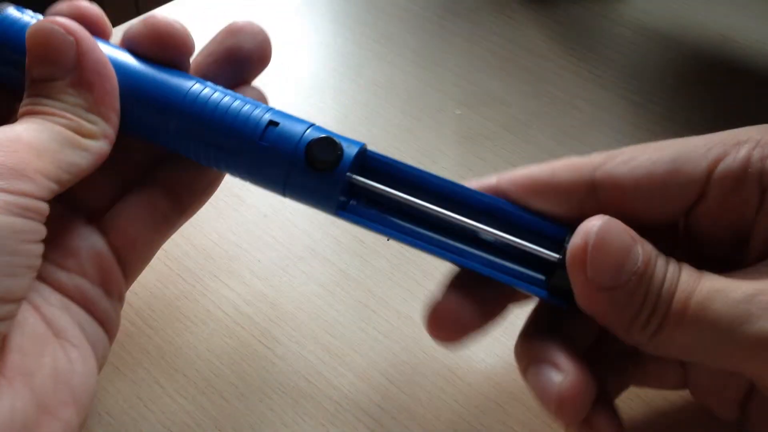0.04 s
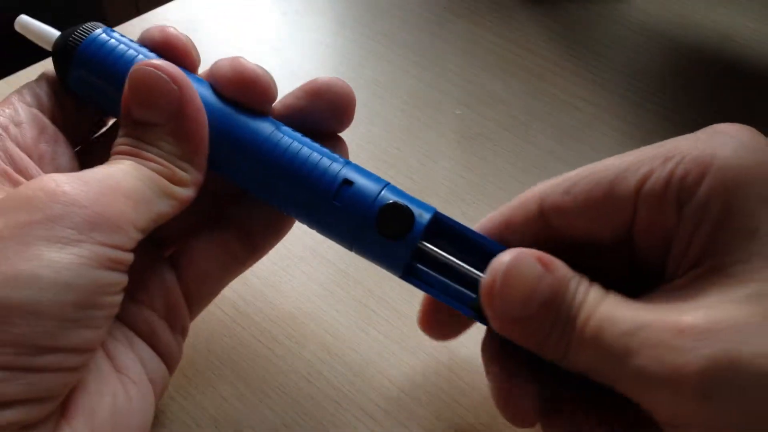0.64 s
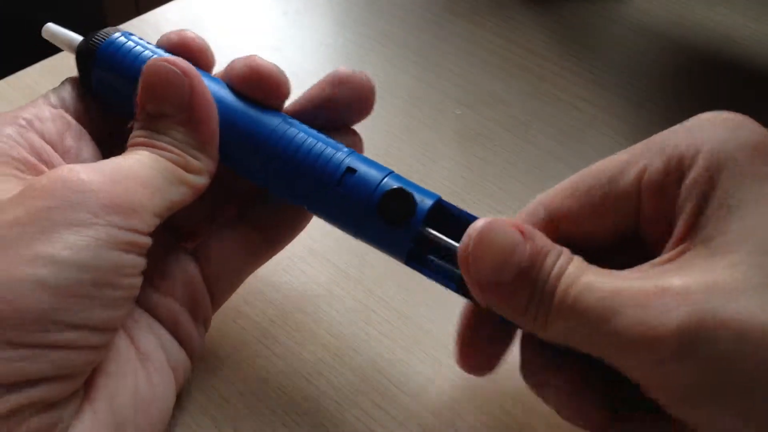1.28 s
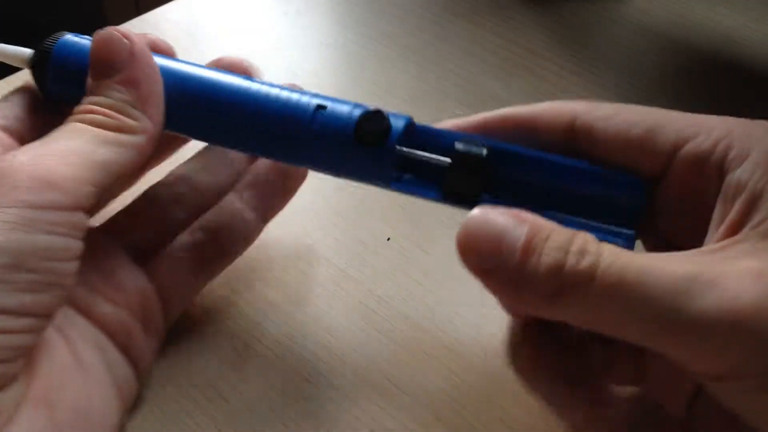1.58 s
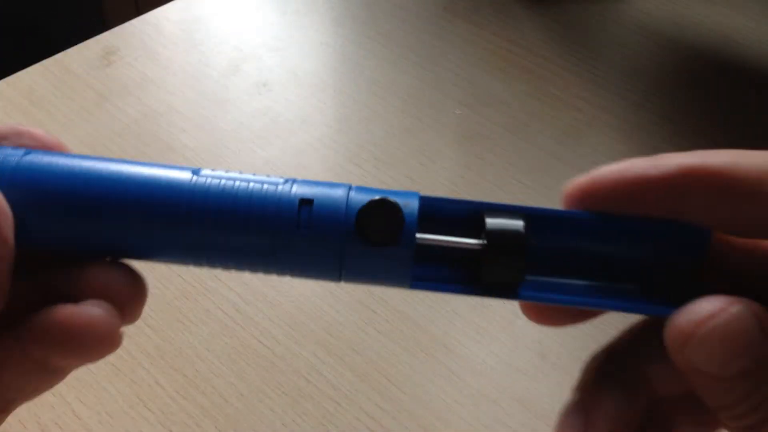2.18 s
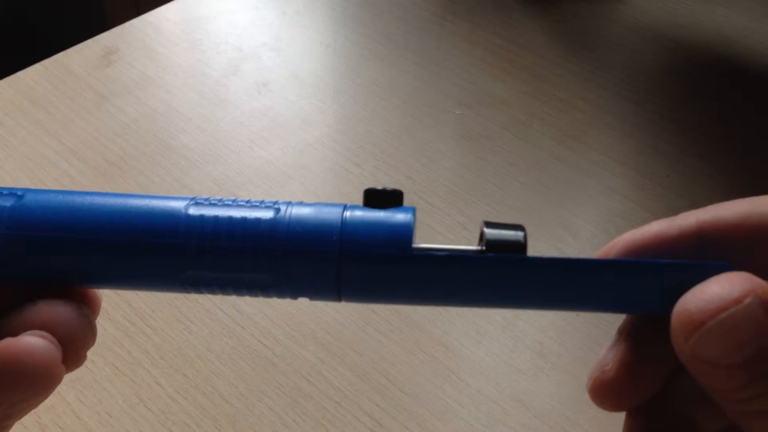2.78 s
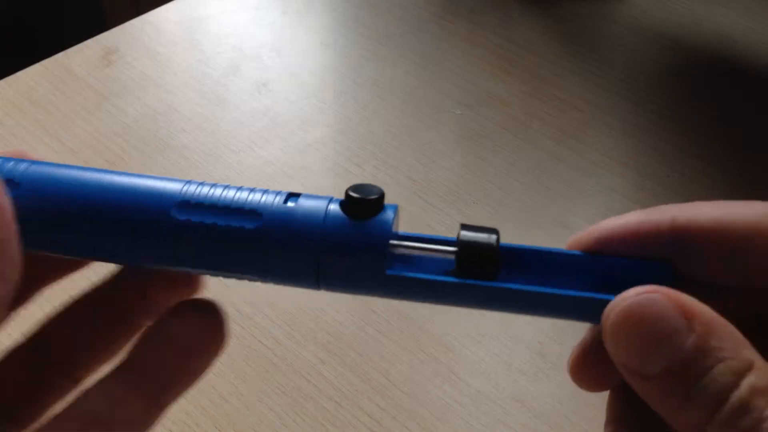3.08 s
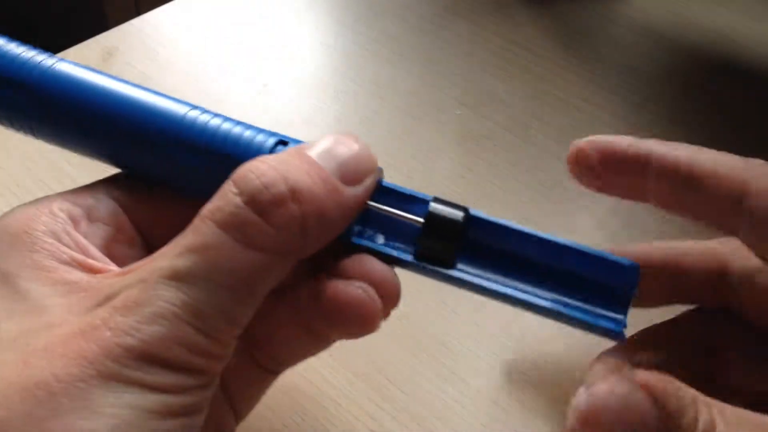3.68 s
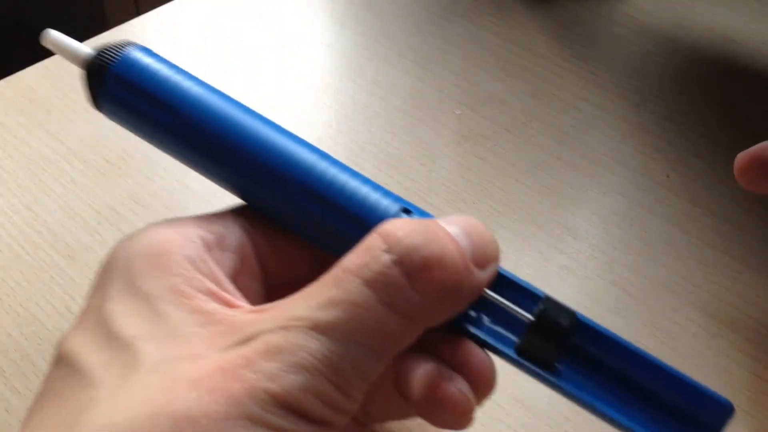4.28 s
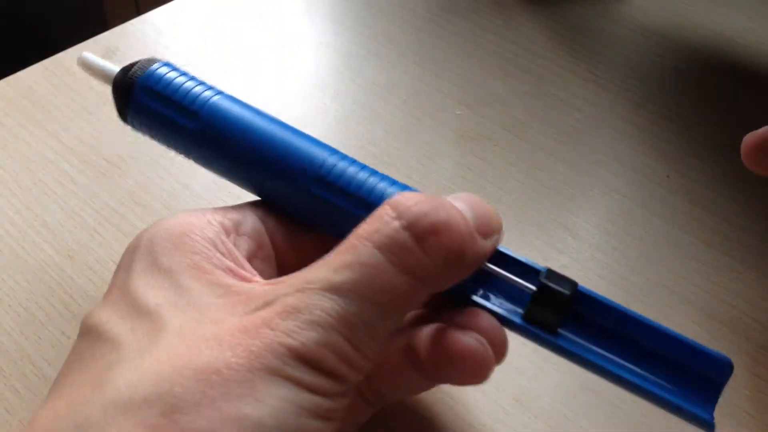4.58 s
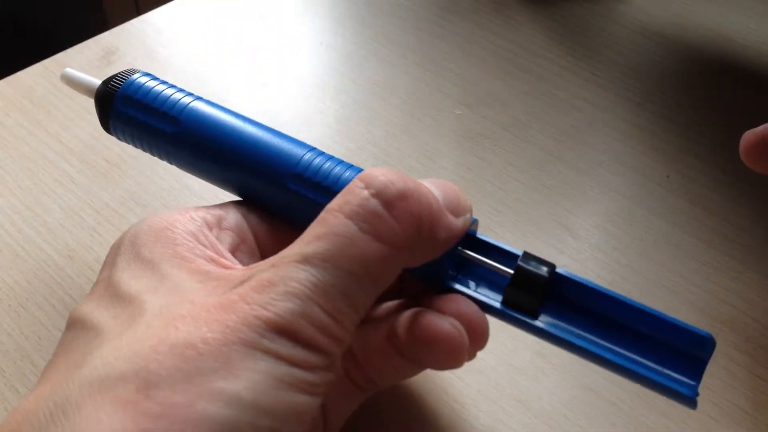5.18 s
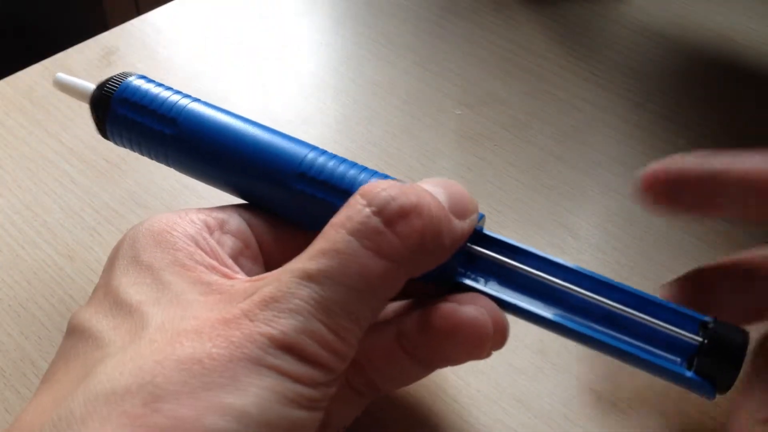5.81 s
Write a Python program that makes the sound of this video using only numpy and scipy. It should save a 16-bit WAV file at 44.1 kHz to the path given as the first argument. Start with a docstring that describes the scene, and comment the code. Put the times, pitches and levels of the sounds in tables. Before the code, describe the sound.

A plastic desoldering pump is cocked close to the microphone in a small, quiet room. The plunger goes in with short, slightly squeaky scrapes and ticks, then latches with a sharp crack. The shell creaks and the slider zips back with a click. Fingers rub faintly on the plastic for a few seconds. Then a soft button click is followed at once by a loud snap, with a low thud and a brief high ring from the steel spring.

```python
"""A plastic desoldering pump is cocked and fired close to the microphone in a small, quiet room.
The plunger scrapes in over a few stick-slip pushes and latches with a crack; the shell creaks and the
slider runs back. Fingers shift their grip, then the button clicks: the piston shoots up the barrel,
slams into its stop and sets the steel spring ringing. Gain control ducks the hiss after both cracks."""
import sys
import numpy as np
from scipy import signal
from scipy.fft import rfft, irfft
from scipy.io import wavfile

SR = 44100
rng = np.random.default_rng(int(sys.argv[2]) if len(sys.argv) > 2 else 0)


def store_pcm(level_fs):
    """Save levels as 16-bit WAV."""
    pcm = np.round(np.clip(level_fs, -1, 1) * 32767).astype(np.int16)
    wavfile.write(sys.argv[1], SR, np.atleast_2d(pcm).T)


N = 257984
TIME = np.arange(N) / SR

# room air and microphone hiss: (frequency [Hz], level [dB])
AIR_COLOUR = [(15, -51), (25, -29), (52, -6), (85, -8.5), (130, -9), (190, -7), (300, -4.5), (480, -9.5),
              (720, -10.5), (1000, -16), (2300, -18.5), (6000, -21), (15000, -22)]
# slow fader ride of the dull background: (time [s], gain [dB])
SWELL_RIDE = [(0, -67.5), (1.5, -73), (2.6, -78), (4.25, -68.5), (5.85, -68)]
# its tone: (frequency [Hz], level [dB])
SWELL_TONE = [(60, -13), (200, 0.5), (330, 0), (650, -6), (1100, -12), (2500, -19.5), (6000, -35)]
# low room modes: (frequency [Hz], width [Hz], level [dB])
LOW_MODES = [(194, 30, -3), (320, 43, 1), (356, 25, -2), (445, 43, -1), (474, 8.3, -6.5), (640, 35, -4.5),
             (690, 46, -4), (970, 30, -11)]
# skin on plastic: (frequency [Hz], level [dB])
SKIN_COLOUR = [(800, -13.5), (1800, -10), (3000, -0.5), (5500, 0), (8000, -3.5), (12000, -5.5),
               (15000, -6.5)]
# finger slides: (middle [s], length [s], level [dB])
FINGER_RUBS = [(.15, .6, -73), (1.64, .06, -68), (2.01, .1, -66), (2.13, .12, -65.5), (2.29, .1, -71),
               (3.27, .45, -70), (3.9, .25, -72.5), (4.4, .7, -77.5)]
# soft knocks through the hands: (time [s], level [dB], pitch [Hz], decay [s])
HAND_KNOCKS = [(.16, -56.5, 196, .025), (1.110, -37, 105, 0.0061), (1.3138, -34, 620, .0012),
               (1.313, -32.5, 243, 0.0035), (1.714, -53, 200, 0.011), (1.745, -57, 110, 0.011),
               (5.339, -42.5, 250, .0061)]
# short ticks, some just ahead of the loud cracks: (time [s], level [dB], bass [dB], treble [dB])
SHORT_TICKS = [(.3553, -36.5, -20, -1), (.3946, -48, -8, 0), (.5232, -51, -15, 10), (.53, -44, -8, -2),
               (.5912, -35, -17, -13), (.6250, -45.5, -5, -5), (.7002, -50, 8, 3), (.7912, -52, 3, 5),
               (.8189, -35.5, -5, 2), (.8227, -33, -10, 8), (.8252, -27, -12, 5), (.9216, -41, 1.5, 6.5),
               (.9654, -36.5, 0, 1.5), (1.0110, -37.5, 3.5, 2.5), (1.0240, -45, 6, -2),
               (1.0802, -35, 0.5, 1), (1.0849, -44.5, -5, -7), (1.1080, -49, -5, -1),
               (1.1900, -42.5, -5.5, -10), (1.2530, -43, -22.5, 4.5), (1.2728, -39, -5.5, -3),
               (1.2928, -35, -8, 2), (1.3137, -24.5, 9, 10), (1.4723, -51.5, -13, -4.5),
               (1.495, -58, -6.5, -2.5), (3.602, -58, 7, -10), (3.752, -58.5, 5.5, -8),
               (5.3348, -41, -3, 5.5), (5.7400, -56.5, 4, -12)]
# plastic shell: (frequency [Hz], width [Hz], level [dB])
SHELL_MODES = [(780, 240, -3), (1980, 180, -8.5), (2880, 300, -6), (3600, 280, -2), (4050, 220, 1),
               (4870, 630, -4.5), (5700, 500, -4), (7230, 800, -7.5), (9600, 1200, -14.5),
               (13000, 2300, -22.5)]
# pushes on the plunger: (start [s], length [s], level [dB], growth [dB], rod squeak in the mix [dB])
PLUNGER_PUSHES = [(.357, .11, -62, 2.5, 6.3), (.529, .04, -55.5, 1, 7), (.572, .023, -50, 5, 0),
                  (.608, .115, -56.5, 2, -7), (.738, .085, -61, 2, -15), (.965, .035, -58, 0, -12),
                  (1.06, .035, -60, 0, -12)]
# barrel under friction: (frequency [Hz], width [Hz], level [dB])
BARREL_MODES = [(1120, 280, -1), (2100, 840, -7), (3250, 340, -2), (3640, 200, -2), (4320, 260, -5),
                (4950, 520, -7), (6600, 1400, -15), (9000, 1100, -14), (12000, 2500, -26)]
# squeaking rod: (frequency [Hz], width [Hz], level [dB])
ROD_MODES = [(2710, 190, -1.5), (3060, 290, -4.5), (4750, 400, -9), (5200, 300, -12), (7900, 490, -22.5)]
# one resonance falls as the plunger goes in: (time [s], frequency [Hz])
PLUNGER_SWEEP = [(.45, 5100), (.59, 4450), (.67, 4050), (.73, 3550), (.8, 3200)]
# fine grit of the rubbing surfaces: (frequency [Hz], level [dB])
FIZZ_COLOUR = [(5000, -20), (9000, -3), (12000, -3), (15000, 3)]
# latch: (frequency [Hz], width [Hz], level [dB])
LATCH_MODES = [(1100, 550, -17), (2019, 350, -15.5), (3205, 140, 5), (4190, 160, 0.5), (4790, 300, -4),
               (6330, 450, -3), (6850, 210, -3), (8700, 1100, -3), (9730, 970, -11.5), (11700, 600, -14),
               (14400, 500, -10.5)]
# coil buzz after the latch: (frequency [Hz], level [dB])
LATCH_BUZZ_COLOUR = [(300, -24.5), (900, -7.5), (2200, -10), (4000, 1), (5500, -2.5), (8000, -5),
                     (11000, -13), (15000, -18)]
# hiss of the slider: (frequency [Hz], level [dB])
SLIDER_COLOUR = [(300, -20), (2000, -19.5), (3200, -2), (4200, -7.5), (6500, -12), (10000, -19.5),
                 (15000, -37.5)]
# release button: (frequency [Hz], width [Hz], level [dB])
BUTTON_MODES = [(1350, 400, 0.5), (2150, 590, 1.5), (3200, 600, -2.5), (4600, 900, -11.5)]
# kick of the tool in the hand: (pitch [Hz], level [dB], decay [s])
RECOIL_THUDS = [(52, -24.5, .0067), (150, -18.5, .0063)]
# air and rubber in the barrel: (frequency [Hz], level [dB])
RUSH_COLOUR = [(30, -4), (80, -12), (170, 5.5), (500, -2.5), (1500, -2), (2900, 4.5), (4000, 0), (5000, -2),
               (7000, -6.5), (10000, -7), (12000, -15.5), (15000, -14.5)]
# piston hits on the end stop: (time [s], level [dB], bass [dB], treble [dB], spring drive [dB])
PISTON_HITS = [(5.3505, -15, 1, -5, -38.5), (5.3513, -26, 6, -4, -39), (5.3585, -18.5, 0, 4, -23),
               (5.3708, -44, -4.5, -1.5, -30), (5.3808, -45, 1.5, -3.5, -36)]
# end stop: (frequency [Hz], width [Hz], level [dB])
STOP_MODES = [(455, 80, 2.5), (645, 150, -7), (945, 230, -2), (1250, 280, 0), (1550, 300, -1),
              (2590, 160, 2), (3200, 390, -0.5), (3880, 620, -2), (4665, 600, 1), (6200, 700, -7.5),
              (7950, 880, -5), (9200, 710, -2.5), (14300, 1200, -13)]
# steel spring: (frequency [Hz], level [dB], t60 [s])
SPRING_MODES = [(935, -27, 1.3), (7520, -5, .12), (7570, -2, 0.1), (7640, -7, .27), (7800, -7.5, 0.35),
                (7870, -9, .38), (7930, -7, .4), (8035, -7, .33), (8160, -8, .33), (8400, -12, .29),
                (9000, -18.5, .24)]
# coil buzz after the slam: (frequency [Hz], level [dB])
STOP_BUZZ_COLOUR = [(100, -9), (300, 0), (1800, 1), (2800, 3), (4000, 2.5), (5300, 5.5), (6500, -3),
                    (8500, -4.5), (10500, -10.5), (15000, -8)]
# room reverb: (frequency [Hz], level [dB], t60 [s])
REVERB_BANDS = [(100, -22.5, .3), (300, -15.5, .36), (800, -18, .3), (2000, -16, .32), (3959, -14.5, 0.36),
                (7100, -17, .28), (9000, -19, .28), (11000, -14.5, 0.33), (15000, -17, .22)]


def undb(db):
    """Decibels to gain."""
    return 10 ** (np.asarray(db) / 20)


def unit(x):
    """Scale to rms 1."""
    return x / np.sqrt(np.mean(x ** 2))


def burst(x):
    """Scale a short sound to the energy of 2 ms at rms 1."""
    return x * np.sqrt(.002 * SR / np.sum(x ** 2))


def add(out, s, x):
    """Mix x into out at time s."""
    start = int(s * SR)
    out[start:start + len(x)] += x[:N - start]


def colour(x, points):
    """Causal EQ through (Hz, dB) points, built from the cepstrum."""
    hz, db = np.transpose(points)
    size = 4096
    log_hz = np.log(np.arange(size // 2 + 1) * SR / size + 1)
    gain = undb(np.interp(log_hz, np.log(hz), db))
    cepstrum = irfft(np.log(gain))
    cepstrum[1:size // 2] *= 2
    cepstrum[size // 2 + 1:] = 0
    return signal.fftconvolve(x, irfft(np.exp(rfft(cepstrum))))[:len(x)]


def hiss(points):
    """Coloured noise of rms 1."""
    return unit(colour(rng.standard_normal(N), points))


def body(modes):
    """Impulse response of (Hz, width, dB) resonances; neighbours swing in opposite directions."""
    t = TIME[:SR // 20]
    return sum((-1) ** k * undb(db) * width * np.exp(-np.pi * width * t) * np.sin(2 * np.pi * hz * t)
               for k, (hz, width, db) in enumerate(modes))


def resonate(x, modes):
    """Drive a body with x; rms 1."""
    return unit(signal.fftconvolve(x, body(modes))[:N])


def room_tone(air_db=-66, dull_db=-2, modes_db=-3):
    """Steady air and microphone hiss, with a dull bed and low room modes that ebb and swell."""
    bed = undb(dull_db) * hiss(SWELL_TONE)
    bed += undb(modes_db) * resonate(rng.standard_normal(N), LOW_MODES)
    fader = undb(np.interp(TIME, *np.transpose(SWELL_RIDE)))
    return undb(air_db) * hiss(AIR_COLOUR) + fader * bed


def handling(grip_db=-82):
    """Skin brushes the plastic in soft swells, never quite still; jolts thud in the hands."""
    rubs = sum(undb(db) * np.exp(-(2 * (TIME - s) / length) ** 2) for s, length, db in FINGER_RUBS)
    out = np.hypot(rubs, undb(grip_db)) * hiss(SKIN_COLOUR)
    for s, db, hz, decay_s in HAND_KNOCKS:
        add(out, s, undb(db) * thud(hz, decay_s))
    return out


def thud(hz, decay_s):
    """A jolt of the whole tool, which soft flesh takes up over half a swing."""
    t = TIME[:SR // 8]
    return np.minimum(2 * hz * t, 1) * np.exp(-t / decay_s) * np.sin(2 * np.pi * hz * t)


def strike(modes, chatter, chatter_s, crack_db=-15.5):
    """One contact and its brief chatter ring a body; the chatter also sounds as a bare crack."""
    response = body(modes)
    t = TIME[:len(response)]
    grit = rng.standard_normal(len(t)) * np.exp(-t / chatter_s) * np.sqrt(t)
    force = chatter * grit / np.sqrt(np.sum(grit ** 2)) + (t == 0)
    ring = signal.fftconvolve(force, response)[:len(t)]
    crack = colour(grit, [(300, -25.5), (2500, 2.5), (8000, -.5), (15000, -7.5)])
    return burst(burst(ring) + undb(crack_db) * burst(crack))


def shade(x, bass_db, treble_db):
    """Tilt the tone of a short sound about the mids."""
    tilt = [(1200, bass_db), (3000, 0), (4400, 0),
            (7000, treble_db), (9000, treble_db), (14000, treble_db - 3)]
    return burst(colour(x, tilt))


def tick(bass_db, treble_db):
    """One short tick, voiced with the shell's resonances."""
    return shade(strike(SHELL_MODES, chatter=.7, chatter_s=.0017), bass_db, treble_db)


def short_ticks():
    """Scattered short ticks, each with its own tone; faint ones fall just ahead of the loud cracks."""
    out = np.zeros(N)
    for s, db, bass_db, treble_db in SHORT_TICKS:
        add(out, s, undb(db) * tick(bass_db, treble_db))
    return out


def stroke(start_s, length_s, db, growth_db, attack_s, release_s):
    """Envelope of a slide: it fades in, builds while it lasts and dies away."""
    t = TIME - start_s
    edges = np.exp(np.minimum(t, 0) / attack_s - np.maximum(t - length_s, 0) / release_s)
    return undb(db + growth_db * np.clip(t / length_s, 0, 1)) * edges


def sweep(x, rows, width_hz):
    """Drive one resonance that glides along (s, Hz) rows; rms 1."""
    hz = np.interp(TIME, *np.transpose(rows))
    carrier = np.exp(2j * np.pi * np.cumsum(hz) / SR)
    pole = np.exp(-np.pi * width_hz / SR)
    return unit((carrier * signal.lfilter([1], [1, -pole], x / carrier)).real)


def plunger_scrape(slip_hz=270, scatter_db=4.2, grit_db=-6.5, fizz_db=-16, barrel_db=-2, sweep_db=-4):
    """The plunger sticks and slips, ringing barrel and rod; grit fills the gaps and fizzes on top."""
    gaps, sizes = rng.standard_normal((1000, 2)).T
    times = np.cumsum(np.exp(.55 * gaps) / slip_hz)
    slips = np.zeros(N)
    slips[(times * SR).astype(int) % N] = undb(scatter_db * np.clip(sizes, -2, 1))
    force = unit(slips) + undb(grit_db) * rng.standard_normal(N)
    rasp = undb(barrel_db) * resonate(force, BARREL_MODES)
    rasp += undb(sweep_db) * sweep(force, PLUNGER_SWEEP, width_hz=350)
    rasp += undb(fizz_db) * hiss(FIZZ_COLOUR)
    squeak = resonate(force, ROD_MODES)
    out = np.zeros(N)
    for s, length, db, growth_db, rod_db in PLUNGER_PUSHES:
        push = stroke(s, length, db, growth_db, attack_s=.005, release_s=.007)
        out += push * (rasp + undb(rod_db) * squeak)
    return out


def latch(at_s=.8265, db=-10):
    """The latch catches with a crack and rattles the coils."""
    out = np.zeros(N)
    crack = strike(LATCH_MODES, chatter=.38, chatter_s=.00088, crack_db=-13)
    add(out, at_s, undb(db) * shade(crack, bass_db=-5.5, treble_db=.5))
    add(out, at_s, coil_rattle(db=-38, t60=.29, points=LATCH_BUZZ_COLOUR))
    return out


def coil_rattle(db, t60, points, dull_hz=7500, treble_s=.07):
    """After a hard hit the loose coils buzz against the barrel, growing duller as they settle."""
    t = TIME[:SR // 3]
    buzz = hiss(points)[:len(t)]
    dull = signal.sosfilt(signal.butter(3, dull_hz, fs=SR, output="sos"), buzz)
    envelope = undb(db - 60 * t / t60) * (1 - np.exp(-t / .002))
    return envelope * (dull + (buzz - dull) * np.exp(-t / treble_s))


def shell_creak(at_s=.9778, gap_s=.004, db=-38.5, count=5, scatter_db=1.5):
    """The shell creaks as the thumb lets go: a quick run of slips."""
    out = np.zeros(N)
    for k, (late, size) in enumerate(rng.standard_normal((count, 2))):
        slip = undb(db + scatter_db * size) * tick(bass_db=3, treble_db=3)
        add(out, at_s + (k + .1 * late) * gap_s, slip)
    return out


def slider_return():
    """The slider zips back, louder as it gathers speed."""
    run = stroke(start_s=1.291, length_s=.023, db=-44.5, growth_db=11, attack_s=.006, release_s=.0015)
    return run * hiss(SLIDER_COLOUR)


def button_click(at_s=5.2548, db=-45.5):
    """The release button clicks under the thumb."""
    out = np.zeros(N)
    add(out, at_s, undb(db) * strike(BUTTON_MODES, chatter=.6, chatter_s=.001))
    return out


def piston_flight(recoil_s=5.3448):
    """The tool kicks in the hand as the piston rushes up the barrel."""
    run = stroke(start_s=5.3482, length_s=.0128, db=-23.5, growth_db=3.5,
                 attack_s=.0008, release_s=.0018)
    out = run * hiss(RUSH_COLOUR)
    add(out, recoil_s, sum(undb(db) * thud(hz, decay_s) for hz, db, decay_s in RECOIL_THUDS))
    return out


def piston_slam(ring_db=-14.5, thud_db=-5, rattle_s=5.358):
    """The piston slams into its stop and bounces, shaking the spring at every hit."""
    out = np.zeros(N)
    clash = burst(body([(7740, 180, 0)]))
    for s, db, bass_db, treble_db, spring_db in PISTON_HITS:
        crack = strike(STOP_MODES, chatter=.27, chatter_s=.0008)
        add(out, s, undb(db) * shade(crack, bass_db, treble_db))
        add(out, s, undb(db + thud_db) * thud(hz=280, decay_s=.0014))
        # the coils clash briefly, then ring freely
        add(out, s, undb(spring_db) * clash)
        add(out, s, undb(spring_db + ring_db) * spring_ring())
    add(out, rattle_s, coil_rattle(db=-40.5, t60=.49, points=STOP_BUZZ_COLOUR))
    return out


def spring_ring(shimmer_rad=1.4, shimmer_hz=130, detune=.0037):
    """The coil's close modes ring on, detuned a little at each hit; its sway makes them shimmer."""
    t = TIME[:SR // 2]
    out = 0
    for hz, db, t60 in SPRING_MODES:
        sway = np.interp(t * shimmer_hz, np.arange(100), rng.standard_normal(100))
        pitch = hz * (1 + detune * rng.standard_normal())
        out += undb(db - 60 * t / t60) * np.sin(2 * np.pi * pitch * t + shimmer_rad * sway)
    return out


def reverb(x, build_s=.004):
    """Diffuse reflections from the desk and near walls; the very top dies first."""
    hz, db, t60 = np.transpose(REVERB_BANDS)
    t = TIME[:SR // 5 * 4]
    noise = rfft(rng.standard_normal(len(t)))
    log_hz = np.log(np.arange(len(noise)) * SR / len(t) + 1)
    tail = 0
    for k, share in enumerate(np.eye(len(hz))):
        band = irfft(noise * np.interp(log_hz, np.log(hz), share), len(t))
        fade = undb(-60 * t / t60[k]) * (1 - np.exp(-(t / build_s) ** 2))
        tail += undb(db[k]) * band * fade / np.sqrt(np.sum(fade ** 2))
    return signal.fftconvolve(x, tail)[:N]


def scene():
    """The pump, cocked and fired, over the room tone; mono."""
    close = plunger_scrape() + slider_return() + latch()
    close += short_ticks() + shell_creak()
    close += piston_flight() + button_click() + piston_slam()
    close += handling()
    return (close + reverb(close) + room_tone())[None]


def gain_control(x, threshold_db=-33, release_db_per_s=11, attack_s=.045, sidechain_hz=4000):
    """A low-passed sidechain ducks the mix just after a loud hit; the gain then creeps back."""
    window = SR // 50
    sidechain = signal.sosfilt(signal.butter(1, sidechain_hz, fs=SR, output="sos"), x[0])
    power = signal.lfilter(np.ones(window) / window, 1, sidechain ** 2)
    over_db = np.maximum(10 * np.log10(power + 1e-12) - threshold_db, 0)
    recovery_db = release_db_per_s * TIME
    duck_db = np.maximum.accumulate(over_db + recovery_db) - recovery_db
    step = 1 / (attack_s * SR)
    for _ in range(2):
        duck_db = signal.lfilter([step], [1, step - 1], duck_db)
    return x * undb(-duck_db)


def record(dry, top_hz=15400):
    """Gain control, soft clipping and a steep top cut."""
    top_cut = signal.ellip(10, .2, 70, top_hz, fs=SR, output="sos")
    return signal.sosfilt(top_cut, np.tanh(gain_control(dry)))


dry = scene()
out = record(dry)
store_pcm(out)
```